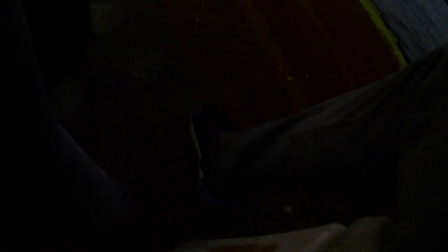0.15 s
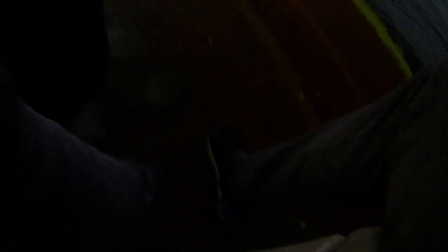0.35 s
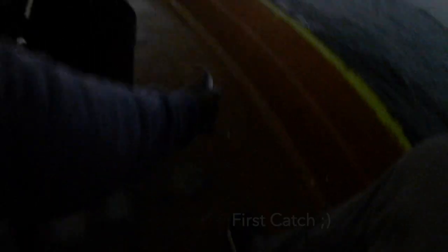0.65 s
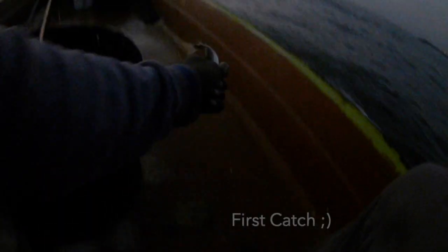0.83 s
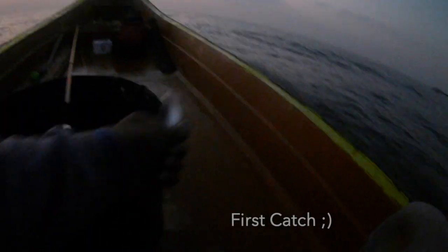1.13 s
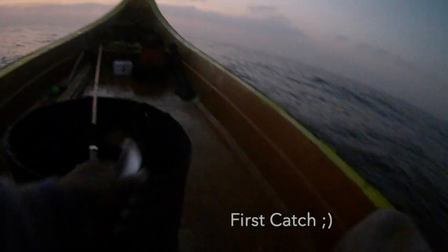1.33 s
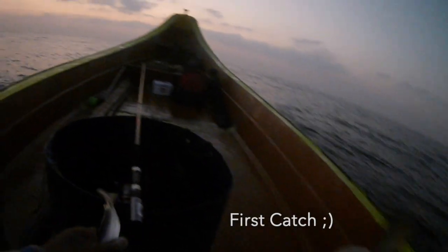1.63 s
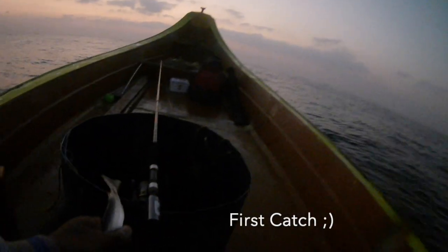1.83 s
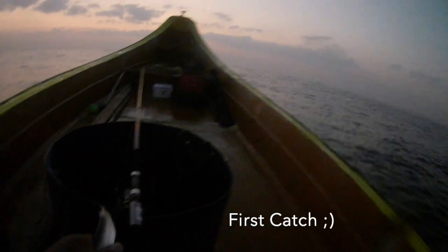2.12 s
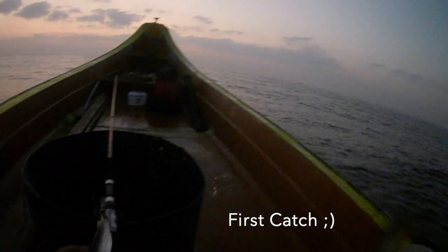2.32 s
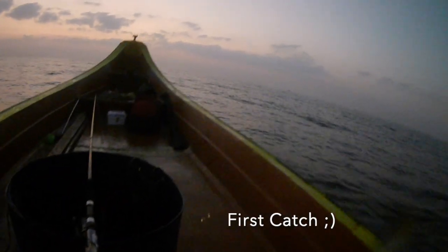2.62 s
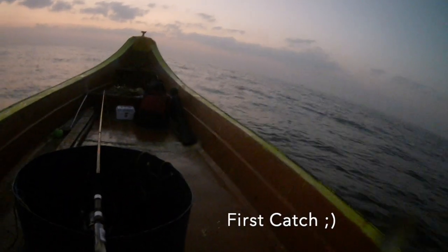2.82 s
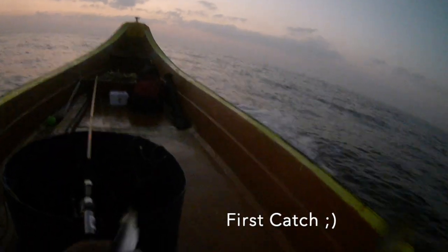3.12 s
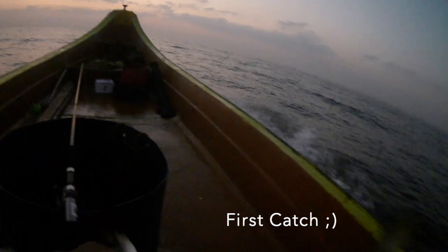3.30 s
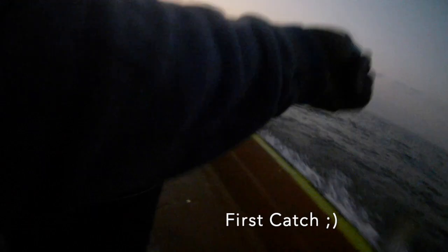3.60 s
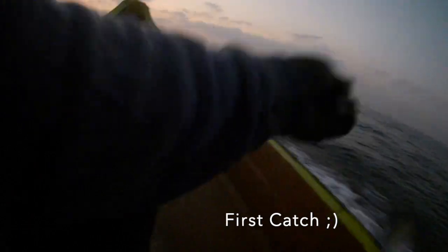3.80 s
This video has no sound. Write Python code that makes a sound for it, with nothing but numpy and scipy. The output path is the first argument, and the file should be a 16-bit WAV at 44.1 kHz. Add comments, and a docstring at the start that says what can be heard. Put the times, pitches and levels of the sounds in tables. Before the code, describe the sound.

A small one-cylinder boat engine runs without a break for about 4 seconds, roughly 21 thumps a second, dipping very slightly in speed after 1 s. Low hull boom dominates, with quiet metallic tapping and raspy exhaust above. One sharp close knock comes at 0.04 s. Water rumbles low underneath, surging around 0.6, 1.6 and 3.6 s. Very faint hiss; on-board microphone, dull top end.

```python
"""On board a small fishing boat: its one-cylinder engine runs at about 21 cycles a second.
Blows timed by the cycle thump the hull's low resonances and tap the metal casing and small parts.
Over them lie chatter and a rasp of gas: noise that swells once a cycle.
Water, surging coloured noise, rumbles along the hull; a struck resonance clicks close by at the start.
A faint, finely ticking hiss lies under it all."""
import sys
import numpy as np
from scipy import signal
from scipy.fft import rfft, irfft, next_fast_len
from scipy.io import wavfile

SR = 44100
rng = np.random.default_rng(int(sys.argv[2]) if len(sys.argv) > 2 else 0)


def wav_out(sig):
    """Save sig, one row per channel (or a flat mono array), as 16-bit PCM at SR to the path in sys.argv[1]."""
    wavfile.write(sys.argv[1], SR, np.round(np.clip(np.atleast_2d(sig).T, -1, 1) * 32767).astype(np.int16))


N = 174195
LEAD = 8192  # samples of margin before and after the scene
SIZE = next_fast_len(N + 2 * LEAD)
T = (np.arange(SIZE) - LEAD) / SR  # seconds
HZ = np.maximum(np.fft.rfftfreq(SIZE, 1 / SR), 1e-3)  # kept above 0 for division

# Valve and piston taps within every cycle. Each row: delay after cycle start in ms, relative level in dB.
TAP_TIMES = [(1.07, -5.81), (6.64, 0.37), (14.24, -1.43), (20.36, -11.12), (23.63, -4.88), (29.51, -0.78),
             (32.27, -4.14), (37.77, -10.28), (43.53, -13.74)]
# Resonances of the small engine parts. Each row: frequency in Hz, width in Hz, relative level in dB.
PART_RESONANCES = [(2200, 43, 6), (2320, 55, -36), (2516, 28, 7), (3607, 57, 0.5), (3860, 71, -6.5),
                   (4070, 90, -1.5)]
TAP_SCATTER_DB = 0.25
PARTS_LOW_HZ, PARTS_TOP_HZ = 1980, 4150


def undb(db):
    """Decibels to gain."""
    return 10 ** (np.asarray(db) / 20)


def curve(points):
    """Straight lines in time through (s, value) points."""
    return np.interp(T, *np.array(points).T)


def rolloff(ratio, order):
    """Filter gain that falls steeply once the ratio passes 1."""
    return 1 / np.hypot(1, ratio ** order)


def sound(spectrum):
    """Waveform of a spectrum, at unit rms within the scene."""
    wave = irfft(spectrum, SIZE)
    return wave / np.std(wave[LEAD:LEAD + N])


def noise(points):
    """Unit-rms noise coloured by (Hz, dB) points, falling below the first and an octave above the last."""
    hz, db = np.array(points).T
    colour = undb(np.interp(np.log(HZ), np.log(hz), db))
    band = rolloff(hz[0] / HZ, order=3) * rolloff(HZ / (2 * hz[-1]), order=4)
    return sound(rfft(rng.standard_normal(SIZE)) * colour * band)


def body(modes):
    """Response of parallel resonances; successive rows swing in opposite directions."""
    response = 0
    for k, (hz, width_hz, db) in enumerate(modes):
        response = response + (-1) ** k * undb(db) / (1 + 1j * (HZ ** 2 - hz ** 2) / (HZ * width_hz))
    return response


def blows(starts, delay_ms, scatter_db, jitter_ms):
    """Spectrum of one impulse per start, scattered in strength and timing."""
    size, slip = rng.standard_normal((len(starts), 2)).T
    at = starts + (delay_ms + jitter_ms * slip) * SR / 1000
    gain = undb(scatter_db * size)
    # an impulse between two samples is shared by both
    whole, part = at.astype(int), at % 1
    places = np.r_[whole, whole + 1]
    weights = np.r_[gain * (1 - part), gain * part]
    return rfft(np.bincount(places, weights, SIZE)[:SIZE])


def hiss():
    """Steady coloured noise, with evenly timed high-passed ticks in it."""
    # Each row: frequency in Hz, relative density in dB per Hz.
    hiss_colour = [(1000, 1), (4000, -3), (5000, -5.5), (7200, -6.5), (8400, 4), (10000, 2.5), (13500, 1.5)]
    hiss_db, tick_db = -77, -90
    tick_hz, tick_first_s = 46.875, 0.0177
    tick_scatter_db, tick_low_hz = 2, 7000
    starts = np.arange(LEAD + tick_first_s * SR, LEAD + N, SR / tick_hz)
    ticks = sound(blows(starts, 0, tick_scatter_db, 0) * rolloff(tick_low_hz / HZ, order=2))
    return undb(hiss_db) * noise(hiss_colour) + undb(tick_db) * ticks


def water():
    """The sea rumbles along the hull: low coloured noise in slow surges."""
    # Each row: frequency in Hz, relative density in dB per Hz.
    water_colour = [(20, -9), (42, -12), (64, -2), (100, -1), (155, -1), (220, -1.5), (300, -9), (450, -24),
                    (800, -55.5)]
    # Each row: time in seconds, level in dB.
    surge_level = [(0, -47), (.4, -45.5), (.55, -41.5), (.72, -41), (.85, -45.5), (.98, -44), (1.22, -50),
                   (1.54, -43.5), (1.78, -44.5), (2.05, -49), (2.35, -45), (2.6, -50), (3.0, -51),
                   (3.4, -47), (3.6, -41.5), (3.95, -46)]
    return undb(curve(surge_level)) * noise(water_colour)


def click():
    """A small hard object knocks once and rebounds: impulse and short crack ring its resonances."""
    # Each row: start in seconds, level in dB.
    knocks = [(.0355, -30), (0.0432, -58)]
    # Each row: frequency in Hz, width in Hz, relative level in dB.
    knock_modes = [(480, 150, 2), (725, 110, 2), (896, 140, 1.5), (1360, 224, 7.5), (2245, 290, 1.5),
                   (3080, 215, -1.5), (4220, 330, 2), (5400, 840, -11.5), (6190, 420, -9),
                   (9730, 570, -13.5), (11400, 900, -20)]
    crack_gain, crack_decay_s = 0.041, 0.006  # gain relative to the impulse
    push = np.zeros(SIZE)
    for start_s, db in knocks:
        age_s = np.maximum(T - start_s, 0)
        fade = (T >= start_s) * np.exp(-age_s / crack_decay_s)
        push += undb(db) * crack_gain * fade * rng.standard_normal(SIZE)
        push[LEAD + int(start_s * SR)] += undb(db)
    ring = body(knock_modes)
    unit_peak = np.abs(irfft(ring, SIZE)).max()
    return irfft(rfft(push) * ring, SIZE) / unit_peak


def rasp(turns):
    """Gas noise that swells once a cycle, with every firing."""
    # Each row: frequency in Hz, relative density in dB per Hz.
    gas_colour = [(250, -2.5), (330, -1), (450, -10), (600, -18), (800, -31), (1050, -34.5), (1300, -20.5),
                  (1600, -18), (1900, -27.5), (2400, -32), (2950, -45), (3700, -35.5), (4200, -37.5),
                  (4450, -51)]
    # Each row: time in seconds, level before the swell in dB.
    gas_level = [(0, -52.5), (.55, -53.5), (1.1, -54.5), (2.5, -54), (3.95, -54.5)]
    depth, peak_turn = 0.067, 0.47  # peak as a share of the cycle
    swell = 1 + depth * np.cos(2 * np.pi * (turns - peak_turn))
    return undb(curve(gas_level)) * noise(gas_colour) * swell


def tap_spectrum(starts, jitter_ms):
    """Spectrum of all valve and piston taps."""
    return sum(undb(db) * blows(starts, ms, TAP_SCATTER_DB, jitter_ms) for ms, db in TAP_TIMES)


def small_parts(starts, turns):
    """Taps ring the small parts loosely; noise bursts chatter in them once a cycle."""
    # Each row: time in seconds, level of the tapped ring in dB.
    parts_level = [(0, -77.5), (.6, -76.5), (1.2, -77.5), (2.6, -79), (3.95, -82)]
    jitter_ms = 0.04
    chatter_turn, chatter_sharpness = 0.25, 0.9  # peak as a share of the cycle
    chatter_db, chatter_low_hz = -5, 3010  # dB relative to the tapped ring
    band = rolloff(PARTS_LOW_HZ / HZ, order=8) * rolloff(HZ / PARTS_TOP_HZ, order=16)
    ring = body(PART_RESONANCES) * band
    tapped = sound(tap_spectrum(starts, jitter_ms) * ring)
    burst = np.exp(chatter_sharpness * np.cos(2 * np.pi * (turns - chatter_turn)))
    push = rfft(burst * rng.standard_normal(SIZE))
    chatter = sound(push * ring * rolloff(chatter_low_hz / HZ, order=8))
    return undb(curve(parts_level)) * (tapped + undb(chatter_db) * chatter)


def casing(starts):
    """Valve and piston taps ring the metal casing."""
    # Each row: frequency in Hz, width in Hz, relative level in dB.
    casing_modes = [(1192.1, 14.0, -20.5), (1258.9, 14.0, -2.2), (1327.6, 23.5, -1.8), (1385.7, 97.1, -5.2),
                    (1439.9, 43.3, -5.6), (1467.4, 14.0, -0.4), (1589.2, 21.0, 6.4), (1607.7, 67.3, 4.4),
                    (1629.7, 15.6, 9.9), (1764.5, 14.0, -15.2), (1802.1, 117.9, -14.7),
                    (1797.1, 17.9, -13.1)]
    # Each row: time in seconds, level in dB.
    rattle_level = [(0, -61), (.9, -60.6), (1.3, -58.5), (2.2, -58.1), (2.9, -57.9), (3.4, -59),
                    (3.95, -59.4)]
    low_hz, jitter_ms = 1100, 0.004
    ring = body(casing_modes) * rolloff(low_hz / HZ, order=8)
    return undb(curve(rattle_level)) * sound(tap_spectrum(starts, jitter_ms) * ring)


def hull(starts):
    """Soft thumps of firing and exhaust boom in the low resonances of hull and exhaust."""
    # Each row: frequency in Hz, width in Hz, relative level in dB.
    hull_modes = [(54.8, 19.4, -12.8), (85.8, 14.0, -14.7), (129.9, 25.1, 1.0), (124.2, 20.2, -0.6),
                  (206.5, 60.1, -5.9), (247.5, 156.2, -8.7), (277.1, 48.2, -5.5), (355.1, 14.0, -8.3),
                  (404.4, 32.6, -13.9), (461.2, 14.0, -20.4), (595.0, 67.2, -16.7), (597.1, 52.1, -13.8),
                  (666.6, 26.5, -24.2), (677.8, 17.3, -23.6)]
    # Each row: delay after cycle start in ms, relative level in dB, softness corner in Hz.
    thumps = [(6.16, 1.11, 176.2), (7.14, -1.05, 194.27), (18.55, -2.82, 767.08), (25.27, 1.85, 100.0),
              (28.72, -16.83, 320.31), (37.26, -18.09, 2184.44)]
    level_db, scatter_db = -36, 0.4  # level before engine load
    low_hz, top_hz = 31.6, 750
    push = 0
    for delay_ms, db, soft_hz in thumps:
        push = push + undb(db) * blows(starts, delay_ms, scatter_db, 0) / (1 + 1j * HZ / soft_hz) ** 2
    band = rolloff(low_hz / HZ, order=3) * rolloff(HZ / top_hz, order=12)
    return undb(level_db) * sound(push * body(hull_modes) * band)


def scene():
    """The turning crank times all engine sounds; water, click and hiss join them."""
    # Each row: time in seconds, engine speed in cycles per second.
    engine_speed = [(0.0, 21.456), (0.4, 21.461), (0.85, 21.528), (1.1, 21.354), (1.3, 21.182),
                    (1.9, 21.182), (2.35, 21.373), (2.6, 21.316), (2.85, 21.217), (3.2, 21.096),
                    (3.65, 21.158), (3.95, 21.141)]
    start_turn = 0.2  # share of the cycle at time 0
    load_db_per_hz, cruise_hz = 1.5, 21.3
    speed_hz = curve(engine_speed)
    turns = np.cumsum(speed_hz) / SR
    turns = turns - turns[LEAD] + start_turn
    # sample positions of the whole turns
    whole_turns = np.arange(np.ceil(turns[0]), np.floor(turns[-1]) - 1)
    starts = np.interp(whole_turns, turns, np.arange(SIZE))
    # the engine pulls a little harder when it runs faster
    load = undb(load_db_per_hz * (speed_hz - cruise_hz))
    background = hiss() + water() + click()
    engine = rasp(turns) + small_parts(starts, turns) + casing(starts) + load * hull(starts)
    return (background + engine)[None, LEAD:LEAD + N]


def record(dry):
    """A steep elliptic low-pass cuts the top."""
    top_hz = 13550
    sections = signal.ellip(10, 0.1, 80, top_hz, fs=SR, output="sos")  # 0.1 dB ripple, 80 dB stop
    return signal.sosfilt(sections, dry)


dry = scene()
out = record(dry)
wav_out(out)
```